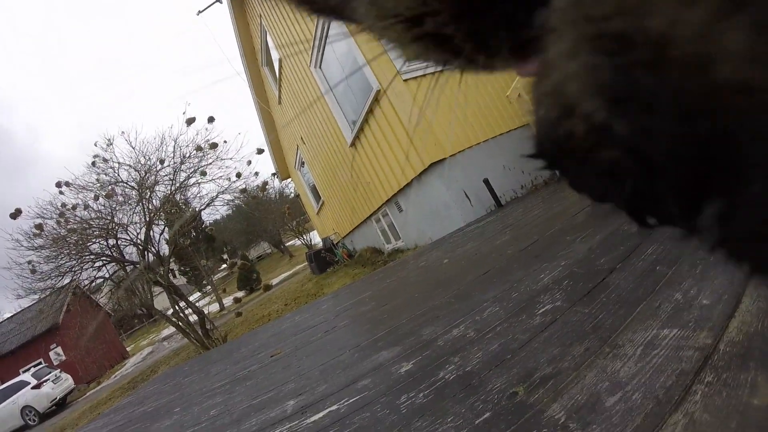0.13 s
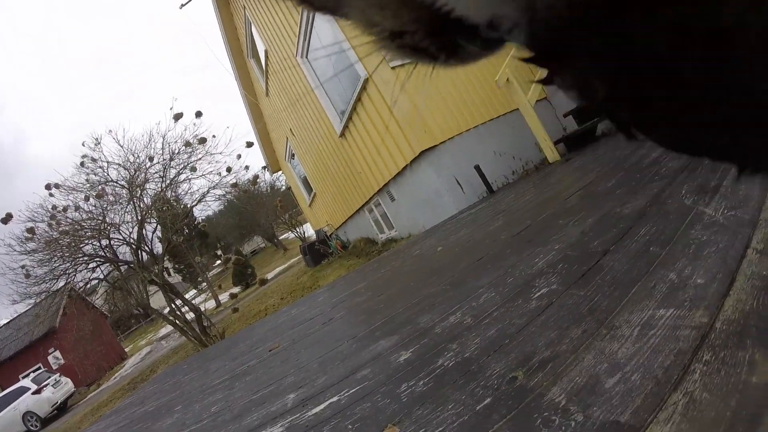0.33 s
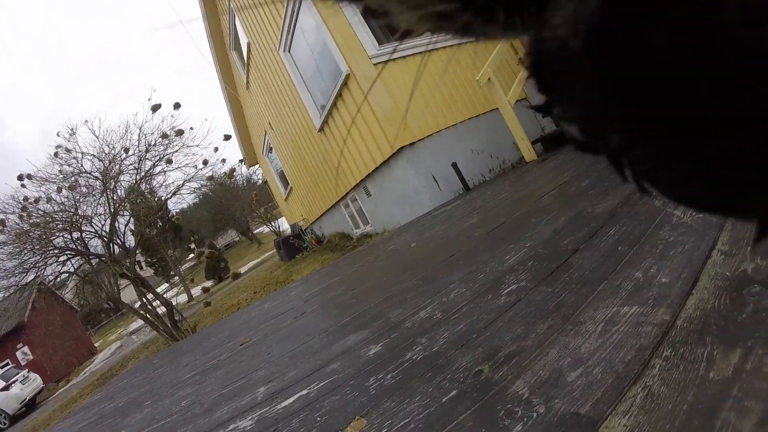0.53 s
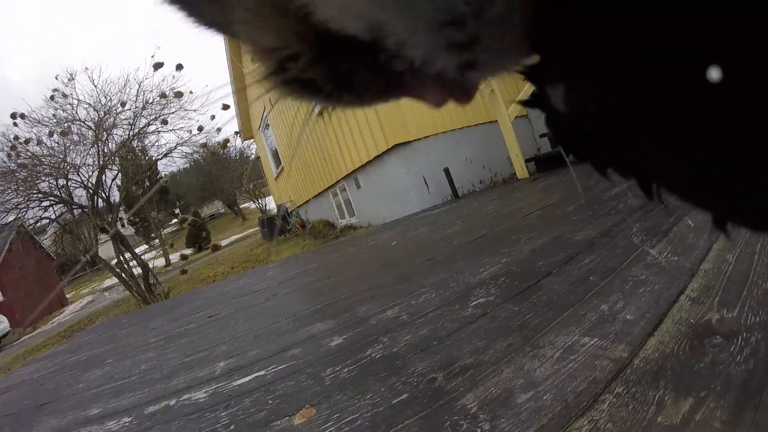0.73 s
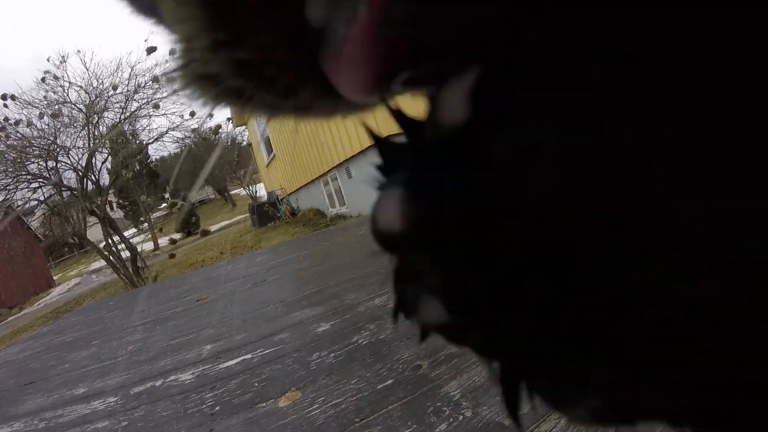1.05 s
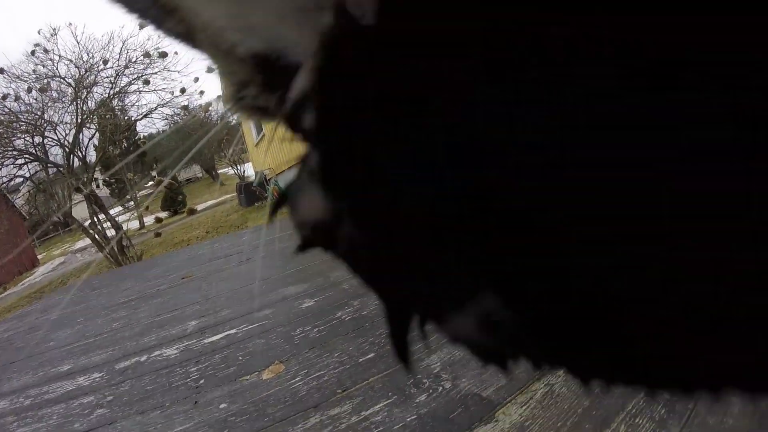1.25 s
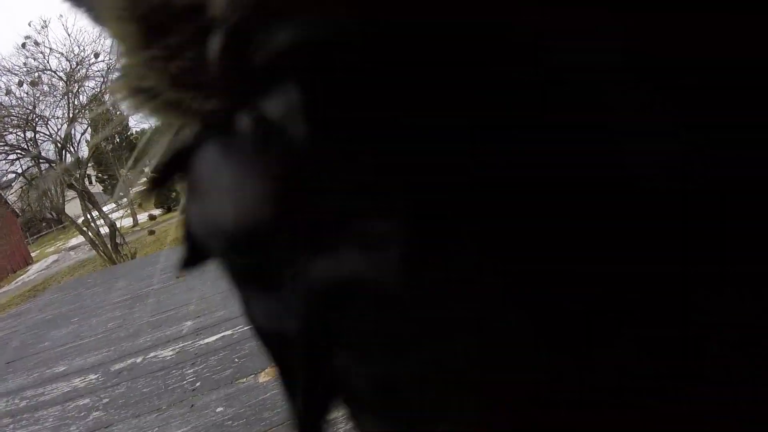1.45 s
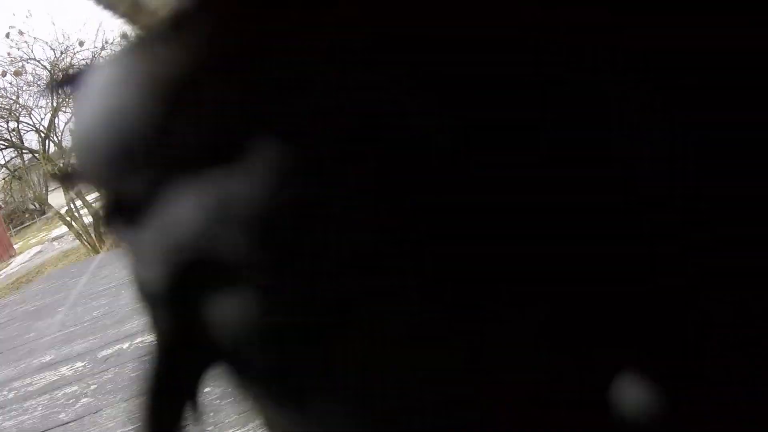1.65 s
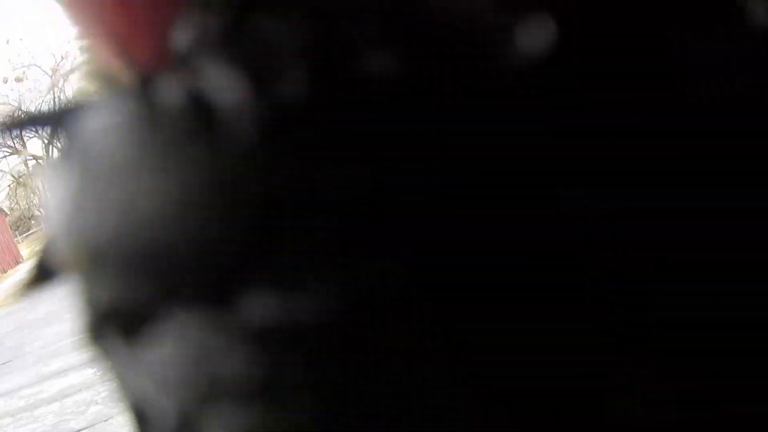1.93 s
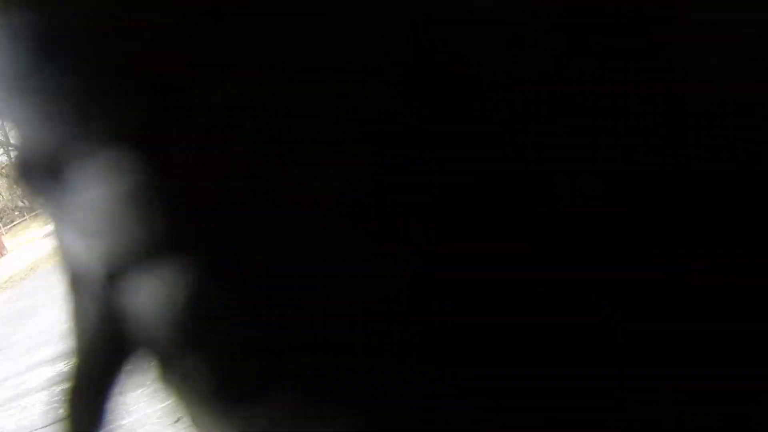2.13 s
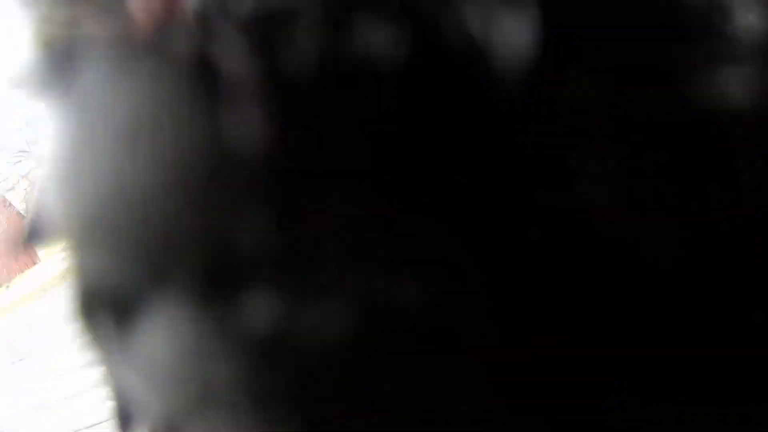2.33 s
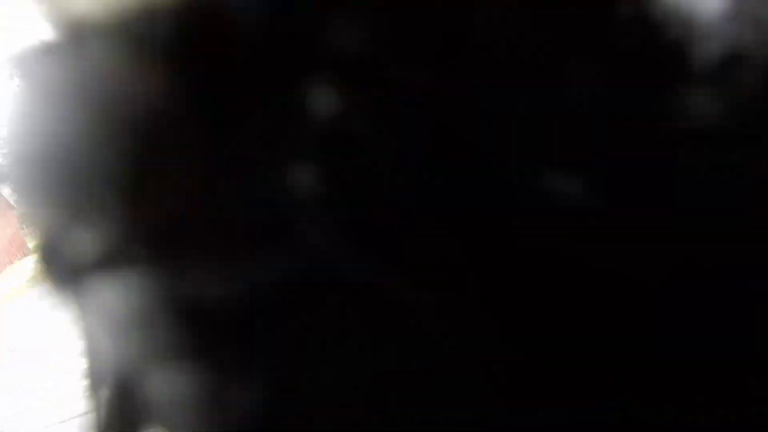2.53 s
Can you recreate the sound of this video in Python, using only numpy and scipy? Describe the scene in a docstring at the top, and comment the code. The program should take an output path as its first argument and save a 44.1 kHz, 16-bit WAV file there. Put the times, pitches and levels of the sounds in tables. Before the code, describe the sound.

A cat grooms itself very close to a small plastic-cased camera outdoors: quick raspy licking strokes, a few tiny claw ticks, and soft deep paw bumps growing stronger, over faint air and low handling rumble.

```python
"""A low rumble and faint open air come first; almost at once a cat's rough licking rises over them.
The cat grooms right against a small camera in a plastic housing, outdoors in a quiet yard.
Its tongue drags through fur in strokes: thousands of tiny slips make the housing ring.
A claw ticks on the plastic as short dying tones, and the paw shoves the housing in deep smooth bumps.
Rumble and air are coloured noise whose level drifts."""
import sys
import numpy as np
from scipy import signal
from scipy.fft import rfft, irfft, next_fast_len
from scipy.io import wavfile
from scipy.ndimage import uniform_filter1d

SR = 44100
rng = np.random.default_rng(int(sys.argv[2]) if len(sys.argv) > 2 else 0)


def generate_wav(signal):
    """Clip the signal to [-1, 1] and save it as 16-bit WAV at the path in sys.argv[1]."""
    frames = np.transpose(np.atleast_2d(signal))
    scaled = np.clip(frames, -1, 1) * 32767
    pcm = np.round(scaled).astype(np.int16)
    wavfile.write(sys.argv[1], SR, pcm)


def gain_from_db(level_db):
    """Convert decibel levels to linear amplitude factors (20 dB per decade)."""
    decades = np.asarray(level_db, float) / 20
    return 10 ** decades


N = 119070  # samples, 2.7 s


def unit(x):
    """Scale a signal to an rms of 1."""
    return x / np.sqrt(np.mean(x ** 2))


def walk(rate_hz):
    """A random wander of rms 1: levels held for 1 / rate_hz seconds, then smoothed twice."""
    hold = int(SR / rate_hz)
    levels = rng.standard_normal(N // hold + 1)
    steps = np.repeat(levels, hold)[:N]
    return unit(uniform_filter1d(uniform_filter1d(steps, hold), hold))


def coloured(table):
    """Noise of rms 1 whose spectrum follows the table's points, joined on a log pitch scale."""
    point_hz, point_db = np.array(table).T
    size = next_fast_len(N)
    hz = np.maximum(np.arange(size // 2 + 1) * SR / size, 1)
    colour_db = np.interp(np.log(hz), np.log(point_hz), point_db, left=-60)
    spectrum = rfft(rng.standard_normal(size)) * gain_from_db(colour_db)
    return unit(irfft(spectrum, size)[:N])


# how loud the handling rumble is over time: time_s [s], level_db [dB, before the flicker]
RUMBLE_LEVEL = [(0, -58), (.3, -57), (.55, -53), (.9, -54), (1.22, -49), (1.4, -57), (1.5, -56),
                (1.62, -50), (1.95, -52), (2.2, -51), (2.45, -53), (2.7, -54)]
# which pitches the rumble holds, relative only: pitch_hz [Hz], density_db [dB per Hz]
RUMBLE_SPECTRUM = [(12, -3.5), (25, 5), (45, -13.5), (80, -15.5), (150, -21.5), (300, -27.5), (600, -61)]


def rumble(t):
    """Deep noise from handling of the housing; its level flickers as it rises and falls."""
    time_s, level_db = np.array(RUMBLE_LEVEL).T
    flicker_db = 2.0 * walk(12.01)
    return coloured(RUMBLE_SPECTRUM) * gain_from_db(np.interp(t, time_s, level_db) + flicker_db)


# which pitches the open air holds, relative only: pitch_hz [Hz], density_db [dB per Hz]
AIR_SPECTRUM = [(35, -43), (60, 2.5), (987, -13.5), (1680, -9.5), (1930, -9), (2490, -11), (3140, -21.5),
                (4150, -20), (5350, -27), (6440, -24.5), (15200, -38)]


def air():
    """Faint outdoor air: coloured noise whose level drifts slightly around a fixed one."""
    level_db = -58 + 1.54 * walk(5.97)
    return coloured(AIR_SPECTRUM) * gain_from_db(level_db)


def ring(x, table):
    """Resonances added with alternating sign; each wanders in level as the contact spot wanders."""
    total = np.zeros(N)
    for k, (pitch_hz, width_hz, level_db) in enumerate(table):
        wander_db = 1.5 * walk(50)
        resonance = signal.lfilter(*signal.iirpeak(pitch_hz, pitch_hz / width_hz, fs=SR), x)
        total += (-1) ** k * gain_from_db(level_db + wander_db) * resonance
    return total


# how tongue and fur touch, one list a stroke:
# time_s [s], level_db [dB, of the whole rub], low_db [dB, weight of the low part], bright_db [dB, of the high part]
STROKES = [
    [(0.0, -74, -7, -20), (0.008, -73, 5, 0), (0.052, -77, 14, -8), (0.086, -52.5, -1, -15.5),
     (0.214, -53, -3, -10), (0.248, -47, -7, -14.5), (0.296, -47, -3.5, -7.5), (0.324, -54, -1, -17),
     (0.34, -78, 5, -20)],
    [(0.34, -80, -2, -8), (0.358, -62, 0, -18), (0.372, -65, -14, -24), (0.378, -62, 9, -12),
     (0.388, -57.5, -5, -22), (0.394, -60.5, 4.5, -23), (0.436, -50.5, 0, -12.5), (0.475, -48.5, -6, -11)],
    [(0.49, -46.5, -4.5, -19), (0.506, -65, 3, -14), (0.53, -51.5, 0.5, -19), (0.544, -54.5, 4, -5),
     (0.562, -46.5, -8, -11), (0.572, -51.5, 0, -8), (0.592, -38, -2, -9), (0.636, -43.5, -3, -5.5),
     (0.66, -50.5, -3.5, -11)],
    [(0.66, -49, -4.5, -9), (0.714, -49.5, -10, -14), (0.754, -59.5, -1, -15), (0.758, -71, 0, -11),
     (0.77, -56, -2, -18), (0.792, -66.5, 6, -6), (0.805, -53.5, -3, -15)],
    [(0.83, -54, -4.5, -11.5), (0.876, -50.5, 3, -10), (0.884, -46.5, -6.5, -13), (0.916, -54, 1, -9.5),
     (0.922, -51, -4, -15), (0.952, -46.5, 1.5, -12.5), (1.05, -52, -7, -5.5), (1.084, -53, -11, -14),
     (1.12, -64, -12, -7)],
    [(1.12, -70, -9, -6), (1.132, -56, -16, -9), (1.146, -53.5, -14, -6), (1.166, -53.5, -3, -11),
     (1.208, -38.5, -15.5, -12.5), (1.256, -46, -6, -11.5), (1.284, -55.5, -12, -21),
     (1.298, -52.5, -11.5, -12.5), (1.36, -77, 10, -12)],
    [(1.36, -72, 12, -6), (1.368, -70, -3, -25), (1.412, -56.5, 0.5, -8), (1.458, -44.5, -11, -12.5),
     (1.514, -39.5, -17, -11), (1.536, -53.5, -3, -13), (1.556, -78, 0, -8), (1.57, -75, -4, -2)],
    [(1.57, -75, -8, -3), (1.604, -51.5, -7, -6), (1.626, -50, -10, -12), (1.668, -56.5, 0, -11),
     (1.676, -53, -22, -9), (1.684, -57.5, -1, -9), (1.722, -65, -12, -19), (1.728, -75, 10, -7),
     (1.76, -74, 12, -11)],
    [(1.76, -78, 17, -7), (1.778, -68, 4, -17), (1.854, -49.5, -6.5, -15), (1.862, -48.5, -2.5, -3),
     (1.906, -43.5, -3.5, -4), (1.934, -50.5, -3.5, -1), (1.954, -67, -13, -16), (1.97, -81, -1, 6)],
    [(1.97, -81, -5, 1), (1.992, -69, -5, -2), (2.0, -75, 7, 4), (2.02, -58, -4, -12.5),
     (2.096, -48.5, -8, -14.5), (2.112, -53, -14, -17), (2.126, -65, -5, -12), (2.144, -66, -12, -17),
     (2.15, -80, 2, -7)],
    [(2.15, -78, -6, -10), (2.186, -78, 17, -1), (2.202, -62, 0, -20), (2.214, -62, 9, -14),
     (2.222, -65.5, 2, -17), (2.254, -53.5, -2, -16), (2.26, -52.5, -4, -18), (2.28, -52, -1, -7)],
    [(2.28, -50.5, -8, -17), (2.302, -42, -11, -9), (2.31, -48, -2.5, -4.5), (2.346, -46, -0.5, 2),
     (2.358, -40.5, -5.5, -5.5), (2.384, -51.5, -6, -5.5), (2.398, -79, -2, 4), (2.406, -66, -11, -10),
     (2.41, -75, -3, -11)],
    [(2.41, -75, 2, -5), (2.426, -70, -9, -2), (2.452, -55.5, -1, -11), (2.496, -46.5, -6.5, -18),
     (2.504, -47.5, -5, -16.5), (2.532, -49.5, -15, -20), (2.538, -56, -2, -15), (2.584, -54, -23, -15),
     (2.6, -92, 3, -10)],
    [(2.6, -76, 1, -12), (2.622, -78, 5, -5), (2.634, -65, -2, -14), (2.654, -81, 14, -11),
     (2.7, -54.5, 0, -16)],
]
# resonances of the plastic housing, low, middle and high: pitch_hz [Hz], width_hz [Hz],
# level_db [dB, relative within one table, before the wander]
LOW_RESONANCES = [(1400, 650, -8), (1564, 320, 2), (1801, 190, 4.5), (1850, 220, -1)]
MID_RESONANCES = [(2145, 274, 1.5), (2406, 165, 4.5), (2540, 163, 4), (2843, 260, 0), (3500, 470, -7),
                  (4180, 210, -9)]
HIGH_RESONANCES = [(4625, 500, -3), (6310, 444, 5), (7010, 830, -1), (8700, 800, -8.5)]
# the finest fur hiss above them, same columns: pitch_hz [Hz], width_hz [Hz], level_db [dB]
FUR_HISS = [(9800, 1600, -2.5), (11800, 1500, 0.5), (13600, 2500, -6)]


def grooming(t):
    """Dense uneven slips of tongue barbs through fur ring the housing; each part is patchy."""
    slips_per_s, slip_spread_db = 5000, 1.5
    patch_db, patch_rate_hz = 0.66, 70
    time_s, level_db, low_db, bright_db = np.vstack(STROKES).T
    low, bright = np.interp(t, time_s, low_db), np.interp(t, time_s, bright_db)

    chance, side, strength = rng.random((3, N))
    happens = chance < slips_per_s / SR
    slips = happens * np.sign(side - 0.5) * gain_from_db(-slip_spread_db * np.log(1 - strength))

    shared = walk(patch_rate_hz)

    def part(x, db):
        """One part at its level, with patches half shared with the others and half its own."""
        patches = (shared + walk(patch_rate_hz)) / np.sqrt(2)
        return unit(x) * gain_from_db(db + patch_db * patches)

    rub = part(ring(slips, LOW_RESONANCES), low)
    rub += part(ring(slips, MID_RESONANCES), 0)
    rub += part(ring(slips, HIGH_RESONANCES), bright)
    # the broad dull part of the rub
    dull = signal.lfilter(*signal.butter(1, 526, fs=SR), slips)
    rub += part(dull, -8 + low + 0.13 * bright)
    # slips played backwards give the hiss its own timing; it grows faster with brightness
    rub += part(ring(slips[::-1], FUR_HISS), -13 + 1.11 * bright)
    return rub * gain_from_db(np.interp(t, time_s, level_db))


# claw ticks: start_s [s], level_db [dB, before the gain and the tones' own levels]
CLAW_TICKS = [(0.07, -46.5), (0.3845, -42.5), (0.4818, -32), (0.8151, -31.5), (1.5972, -49), (1.8159, -44),
              (1.9098, -47), (2.3284, -42), (2.356, -46.5)]
# tones a tick rings: pitch_hz [Hz], level_db [dB, relative], t60_s [s, time to fall by 60 dB]
TICK_TONES = [(1637, 12, 0.006), (2140, 5, 0.013), (443, -4.5, 0.0093), (4000, -24, 0.0062),
              (6440, -25, .01)]


def ticks(t):
    """A claw tip taps the plastic, which answers with a few short dying tones."""
    gain_db, rise_s = 1, 0.0006
    out = np.zeros(N)
    for start_s, level_db in CLAW_TICKS:
        age = np.maximum(t - start_s, 0)
        tap = np.zeros(N)
        for pitch_hz, tone_db, t60_s in TICK_TONES:
            decay = np.exp(-np.log(1000) * age / t60_s)
            tap -= gain_from_db(tone_db) * np.sin(2 * np.pi * pitch_hz * age) * decay
        rise = 1 - np.exp(-age / rise_s)
        out += gain_from_db(level_db + gain_db) * tap * rise
    return out


# paw shoves: centre_s [s], pressure [signal units, + in, - out], length_s [s, rough length of the bump]
PAW_SHOVES = [(0.404, -0.0066, 0.019), (0.519, -0.01, 0.043), (0.583, .01, 0.025), (0.636, -0.017, 0.032),
              (1.005, -0.0038, 0.017), (1.199, -0.021, 0.015), (1.211, 0.0022, .014),
              (1.229, -0.014, 0.016), (1.238, 0.0099, 0.0091), (1.246, -0.017, 0.016),
              (1.655, 0.022, 0.0068), (1.666, -0.029, 0.008), (1.68, 0.024, 0.02), (1.687, -0.048, 0.011),
              (1.88, -0.042, 0.034), (1.904, 0.047, 0.022), (2.029, -0.032, .007), (2.039, 0.012, 0.0052),
              (2.05, -0.028, 0.016), (2.091, -0.071, 0.0071), (2.099, 0.029, 0.016), (2.118, -.014, .01),
              (2.154, 0.016, 0.025), (2.29, 0.015, 0.05), (2.319, -0.032, 0.048), (2.328, 0.026, 0.0075),
              (2.344, 0.07, 0.048), (2.36, -0.031, 0.0075), (2.407, 0.012, 0.013), (2.424, -0.0017, 0.028),
              (2.496, -0.024, 0.0081), (2.505, 0.014, .01)]


def shoves(t):
    """The paw pushes on the housing: each shove is a smooth bell-shaped swing of pressure."""
    push = np.zeros(N)
    for centre_s, pressure, length_s in PAW_SHOVES:
        push += pressure * np.exp(-((t - centre_s) / (0.34 * length_s)) ** 2)
    return push


def scene():
    """All sources added at one microphone."""
    t = np.arange(N) / SR
    mix = rumble(t) + air() + grooming(t) + ticks(t) + shoves(t)
    return mix[None]  # one channel


def roll_off(x):
    """The treble ends steeply here."""
    return signal.sosfilt(signal.butter(12, 15310, fs=SR, output="sos"), x)


def record(dry):
    """The microphone weakens the slowest swings, below 5.6 Hz, and cuts the top above 15300 Hz."""
    x = signal.lfilter(*signal.butter(1, 5.6, "high", fs=SR), dry)
    finished = signal.sosfilt(signal.ellip(8, 0.2, 70, 15300, fs=SR, output="sos"), x)
    return roll_off(finished)


dry = scene()
out = record(dry)
generate_wav(out)
```